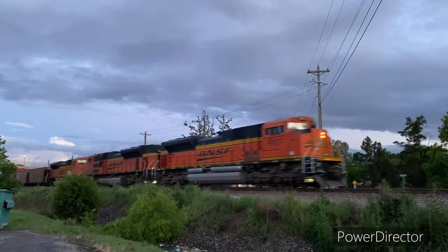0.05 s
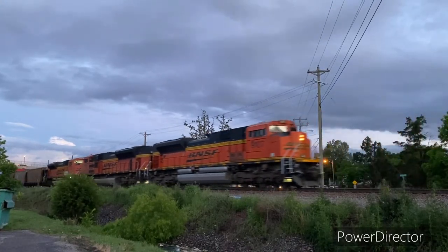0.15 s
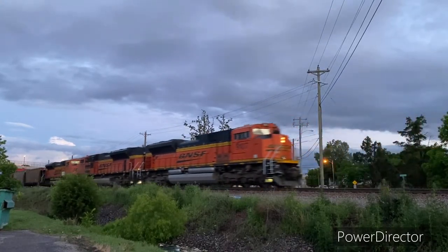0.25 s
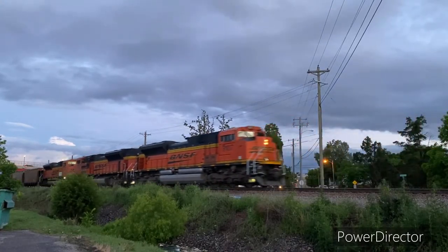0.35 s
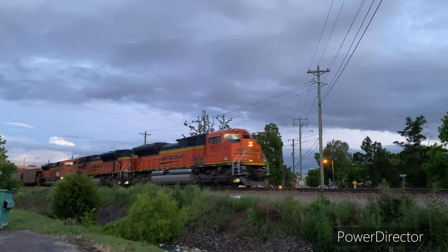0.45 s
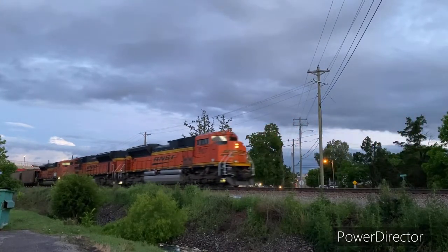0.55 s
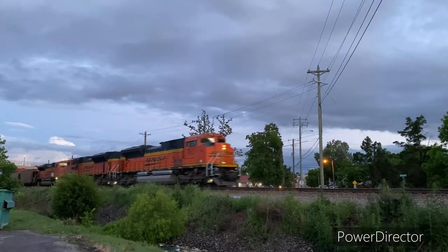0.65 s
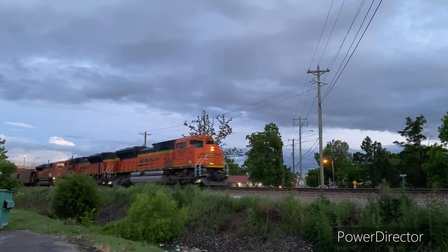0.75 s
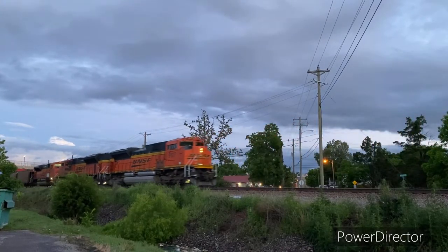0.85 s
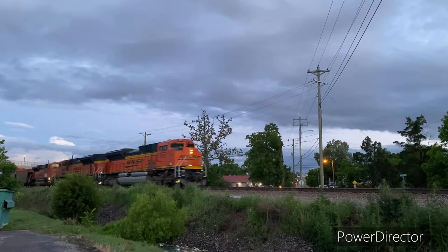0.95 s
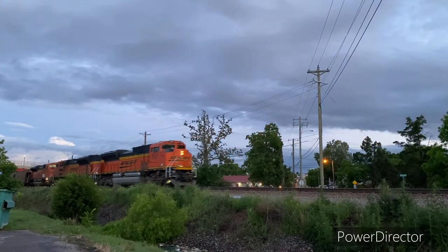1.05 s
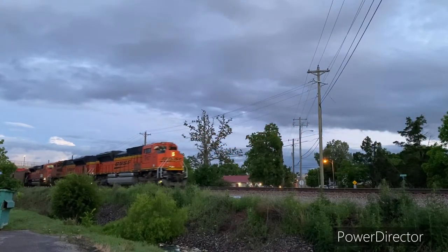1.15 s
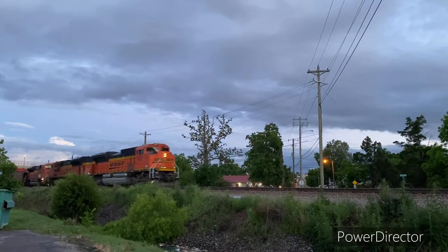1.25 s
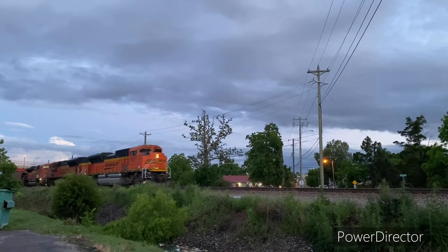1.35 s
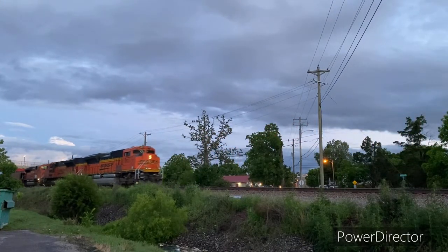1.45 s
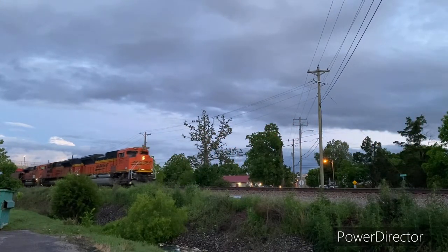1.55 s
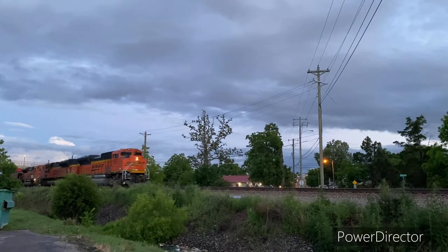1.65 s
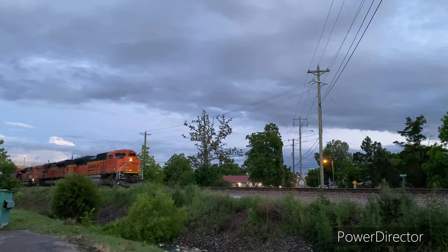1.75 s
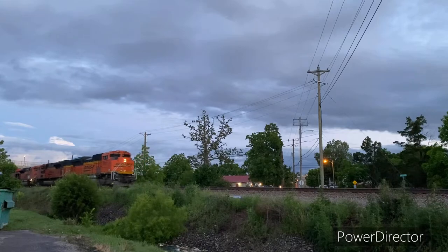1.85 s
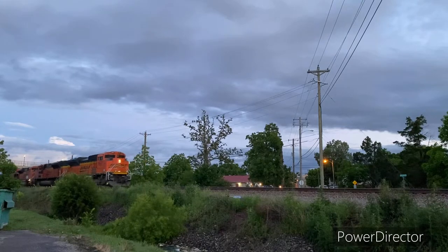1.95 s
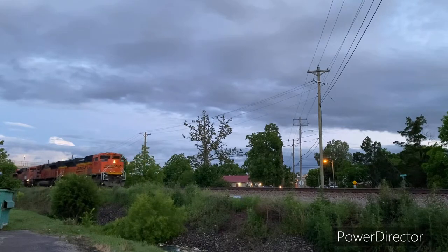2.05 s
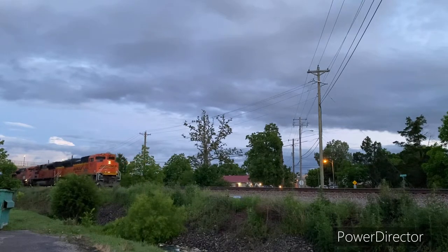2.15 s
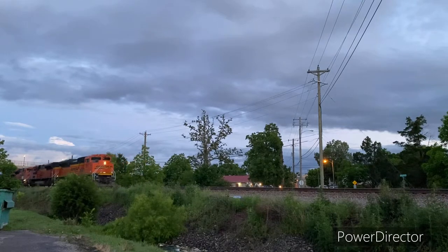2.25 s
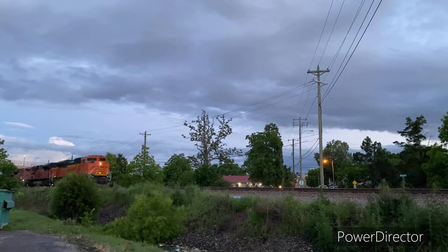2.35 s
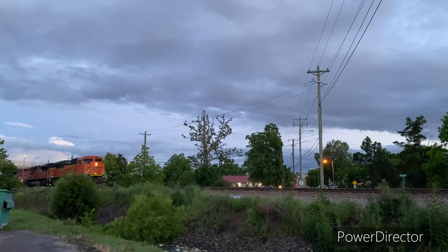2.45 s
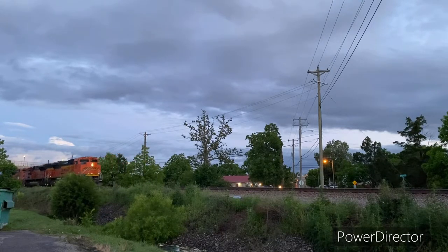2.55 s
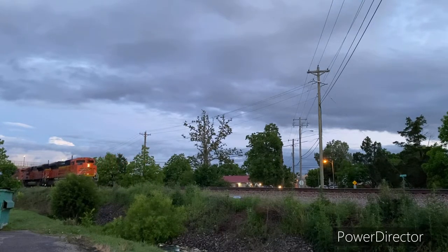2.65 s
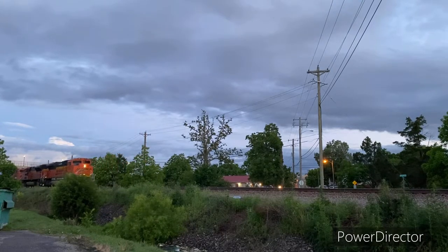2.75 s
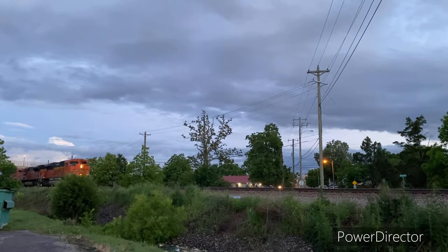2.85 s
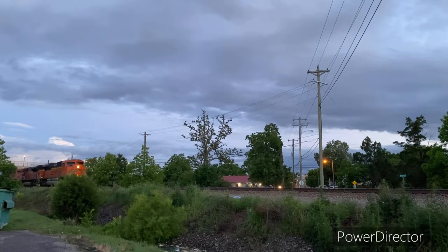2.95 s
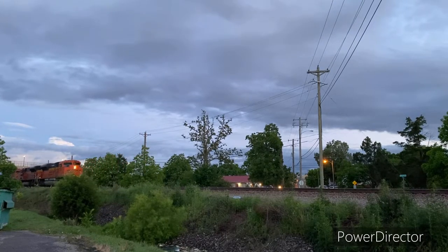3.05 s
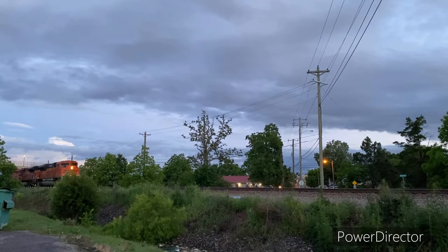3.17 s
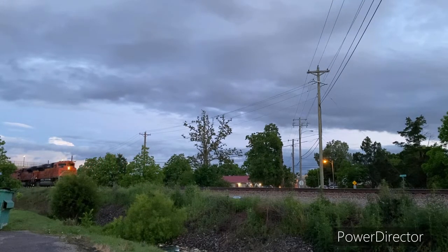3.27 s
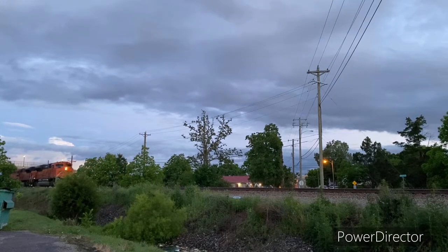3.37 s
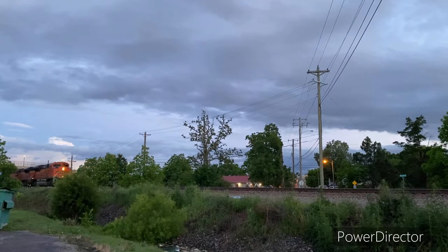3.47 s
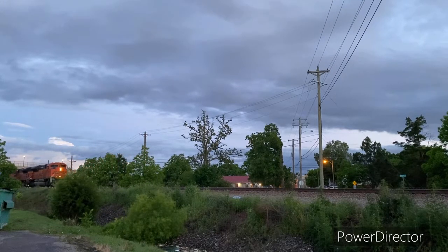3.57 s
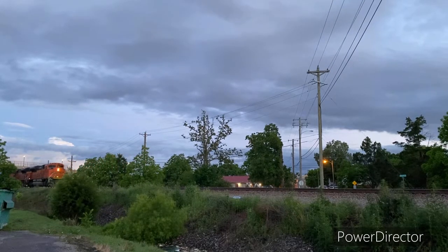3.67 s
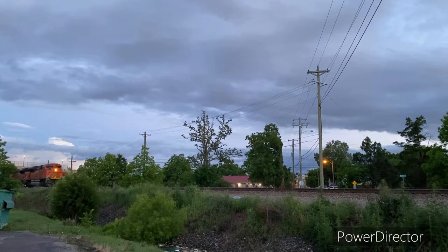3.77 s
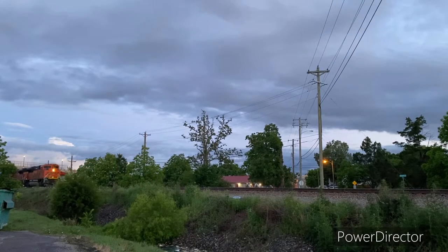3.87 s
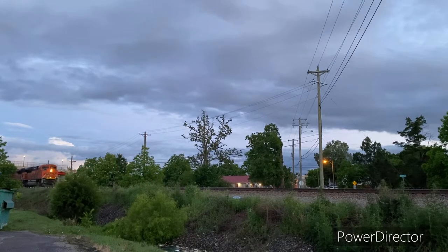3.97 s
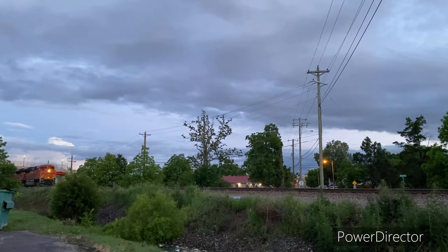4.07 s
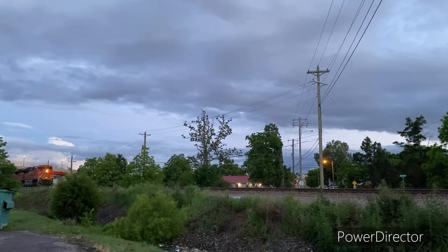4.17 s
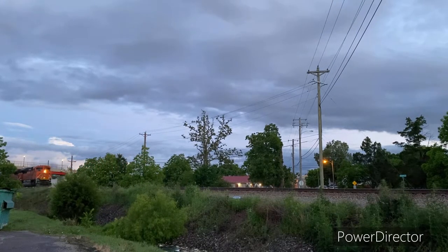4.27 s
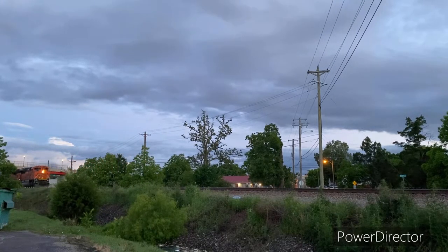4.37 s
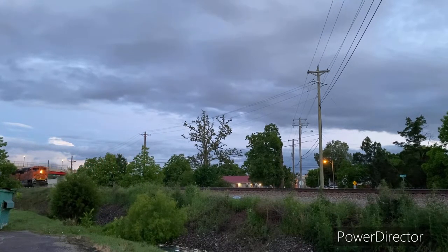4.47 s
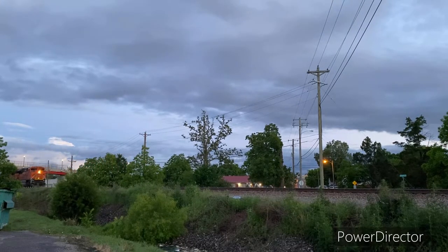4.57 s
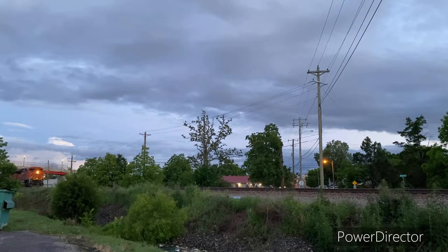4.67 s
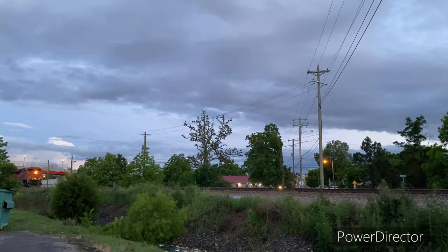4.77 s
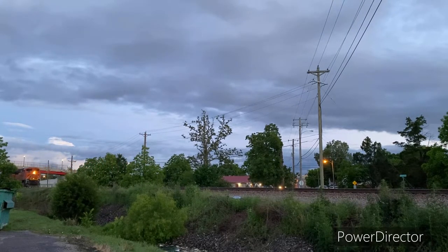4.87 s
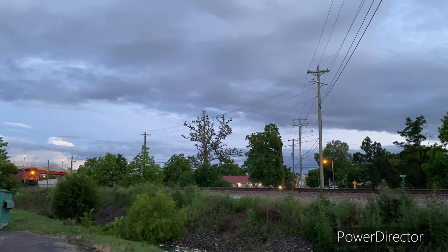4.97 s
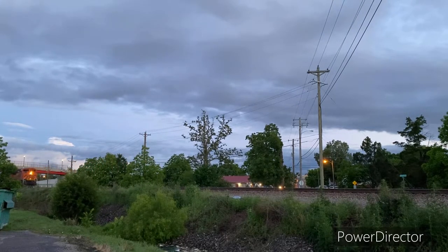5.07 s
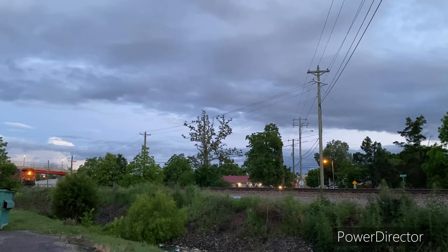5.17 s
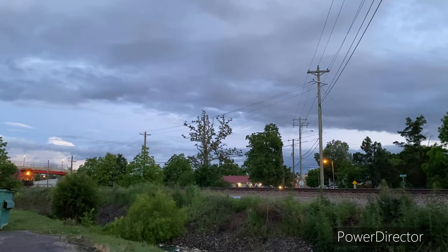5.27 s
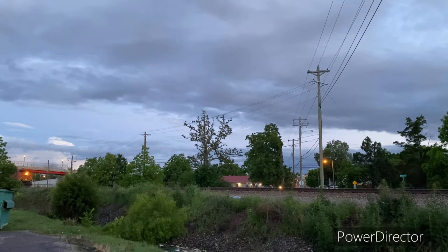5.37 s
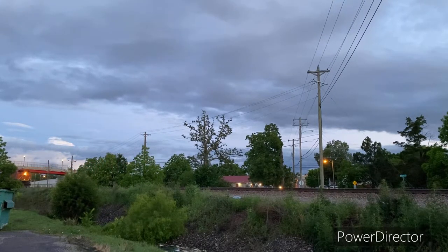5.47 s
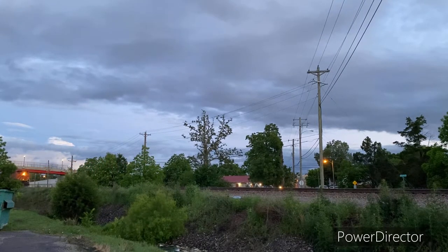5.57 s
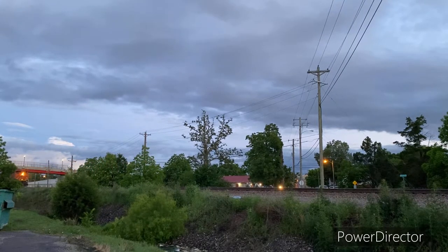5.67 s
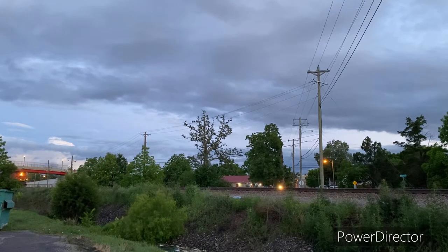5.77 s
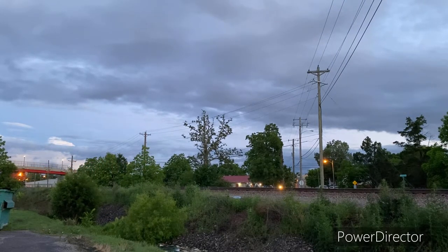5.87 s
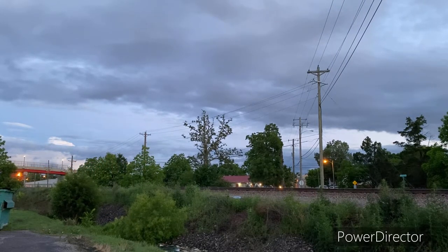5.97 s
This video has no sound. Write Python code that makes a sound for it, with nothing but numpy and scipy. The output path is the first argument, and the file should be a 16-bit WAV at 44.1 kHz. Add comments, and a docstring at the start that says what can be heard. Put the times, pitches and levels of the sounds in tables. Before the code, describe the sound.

Outdoors beside a railway, a fixed phone-like stereo microphone hears diesel locomotives drawing away over six seconds. At 0 s the sound is close and full: a deep, uneven exhaust drone with a quick throb, heavy wheel rumble, rolling roar, many blurred mechanical whines, and a bright steel sizzle with brief squeals and a sharp air spit. Within the first second the brightest parts drop away. From 1 to 2 s, wavering fan hum and gear whine ride over the fading roar, with faint squeals, soft air hisses and cricket trills. Wind buffets in lumps, building to hard low thumps at about 2.8-3.3 s, then easing as the rumble briefly dips. From 4 s the train is distant: a dull, low drone and rumble, thin rail hiss, tiny air spits at about 5.1 and 5.5 s, crickets weakening. It continues to the end, slightly weighted right.

```python
"""Train drawing away at dusk

Diesel locomotives push a long train away from a phone that stands beside the track.
The exhaust drones on multiples of its firing cycle and fans and gears whine as wavering tones.
Wheels roar and squeal and air valves spit, as shaped noise and narrow tones; the train fades with distance.
Crickets trill in the grass as pulsing tones, and a gust buffets the two microphone ports."""
import sys
import numpy as np
from scipy import signal
from scipy.fft import rfft, irfft, next_fast_len
from scipy.io import wavfile
from scipy.ndimage import uniform_filter1d, map_coordinates

SR = 44100
rng = np.random.default_rng(int(sys.argv[2]) if len(sys.argv) > 2 else 0)


def file_out(sig):
    """Save sig as 16-bit WAV at sys.argv[1]."""
    # one column per channel
    cols = np.atleast_2d(sig).T
    # limit, then scale
    lim = np.clip(cols, -1, 1)
    pcm = np.round(lim * 32767).astype(np.int16)
    wavfile.write(sys.argv[1], SR, pcm)


N = 265712
T = np.arange(N) / SR  # seconds
FIRING_HZ = 5.875  # one whole engine cycle, in which every cylinder fires once

# Doppler shift as the path turns away. Each row: time in seconds, pitch factor.
GLIDE = [(0, 1.008), (.5, 1.004), (1.5, 1.001), (3, .997), (6.03, .996)]
# How alike the two ports hear the noises. Each row: frequency in Hz, left-right likeness (0 to 1).
ALIKE = [(50, 0.91), (110, 0.94), (250, 0.96), (600, 0.58), (1500, 0.67), (3000, 0.28), (4300, 0.93),
         (6000, 0.059)]
# Wheel modes that squeal. Each: frequency in Hz, width in Hz.
DEEP, LOW, MIDDLE, HIGH = (3650, 60), (4995, 55), (6520, 110), (11084, 50)


def amp(db):
    """Decibels to gain."""
    return 10 ** (np.asarray(db) / 20)


def unit(x):
    """Scaled to rms 1."""
    return x / np.sqrt(np.mean(np.abs(x) ** 2) + 1e-20)


def along(points, hz):
    """Read a table of (Hz, value) points on a log frequency axis."""
    f, v = np.transpose(points)
    return np.interp(np.log(hz + 1), np.log(f + 1), v)


def curves(rows):
    """One value per sample for each column after the time."""
    s, *cols = np.transpose(rows)
    return [np.interp(T, s, c) for c in cols]


def wobble(rate):
    """A smooth random curve, rate knots a second."""
    knots = rng.standard_normal(int(N * rate / SR) + 4)
    return map_coordinates(knots, [T * rate])


def filtered(x, response):
    """x times a response of frequency."""
    m = next_fast_len(N + 8192)
    return irfft(rfft(x, m) * response(np.fft.rfftfreq(m, 1 / SR)), m)[..., :N]


def rush(spectrum, alike, patchy_db):
    """Stereo noise of rms 1 with patches of random gain, silent outside its spectrum table."""
    z = signal.stft(rng.standard_normal((2, N)), nperseg=512)[2]
    field = rng.standard_normal(z.shape[1:])
    field = uniform_filter1d(uniform_filter1d(field, 6, 0), 12, 1)
    pair = signal.istft(z * amp(patchy_db * unit(field)), nperseg=512)[1][:, :N]

    def mid_side_response(hz):
        inside = (hz > spectrum[0][0]) * (hz < spectrum[-1][0])
        turn = np.arccos(np.clip(along(alike, hz), -1, 1)) / 2
        return amp(along(spectrum, hz)) * inside * [np.cos(turn), np.sin(turn)]

    mid, side = filtered(pair, mid_side_response)
    return unit(np.array([mid + side, mid - side]))


def tone(hz, width_hz, rough, apart):
    """A stereo tone of rms 1; the air and the ground scatter a share of it into a band of noise."""
    share = np.clip(rough, 0, 1)
    blur = lambda: unit(wobble(width_hz) + 1j * wobble(width_hz))
    common = np.sqrt(1 - share) + np.sqrt(share) * blur()
    own = apart * np.array([blur(), blur()])
    carrier = np.exp(2j * np.pi * (np.cumsum(hz * np.ones(N)) / SR + rng.random()))
    return unit(np.real((common + own) * carrier))


def engine():
    """Firing pulses leave the stack as a drone; the higher multiples arrive more scattered."""
    # Exhaust level, wavering as it recedes. Each row: time in seconds, level in dB.
    drone = [(0.0, -27), (0.08, -24), (0.22, -22), (0.64, -18.5), (0.7, -26), (0.79, -20), (0.84, -28),
             (1.46, -20), (1.53, -27), (1.58, -25), (1.88, -21), (2.92, -26), (3.14, -24.5), (3.49, -34.5),
             (4.01, -23.5), (4.09, -25.5), (4.18, -22.5), (5.0, -27.5), (5.07, -23), (5.5, -28),
             (5.72, -22.5), (5.79, -32.5), (5.97, -24.5), (6.03, -27)]
    # Uneven cylinders put lines on many multiples of the cycle.
    # Each row: multiple of the cycle, level in dB relative to the exhaust level.
    orders_db = [(7, -52), (8, 1), (9, -9.5), (10, -14.5), (11, -10.5), (12, -29), (13, -14), (14, -18.5),
                 (15, -11.5), (16, -21.5), (17, -18), (19, -22), (23, -19.5), (24, -15.5), (27, -23.5),
                 (30, -30), (32, -21.5)]
    scatter = .03  # share of noise gained with each multiple above the seventh
    (db,), (glide,) = curves(drone), curves(GLIDE)
    multiples, levels_db = np.transpose(orders_db)
    lines = 0
    for k, level_db in zip(multiples.round(), levels_db):
        line = tone(k * FIRING_HZ * glide, 3.134, rough=scatter * (k - 7), apart=0.092)
        lines = lines + amp(level_db) * line
    return amp(db) * lines


def whines():
    """Fan blades and gear teeth sing with their octave; the nearest unit adds blurred whines,
    some narrow and some broad, that fade."""
    # Wavering fan hum and its octave, gear whine and its octave. Each row: time in seconds, level in dB.
    fan = [(0, -38), (.05, -27), (.12, -34.5), (.25, -29), (.4, -28), (.46, -47), (1, -37), (1.13, -32),
           (1.2, -46), (1.35, -36), (1.52, -36), (1.6, -29.5), (1.74, -46), (1.9, -34.5), (2.04, -33),
           (2.11, -40), (2.25, -34.5), (2.46, -32.5), (2.56, -53), (2.65, -31), (2.86, -34), (2.9, -54),
           (3.17, -35), (3.25, -53), (3.45, -48), (3.57, -36), (3.63, -52), (3.78, -36.5), (3.97, -40),
           (4.1, -58), (4.25, -41), (5, -65), (5.1, -45), (6.03, -52)]
    fan_octave = [(0, -35), (.3, -36.5), (.38, -49), (.5, -34), (.68, -36.5), (.85, -38.5), (1, -47),
                  (1.25, -42), (1.45, -42.5), (1.65, -49), (1.75, -50), (1.9, -42), (2, -50), (2.12, -39),
                  (2.35, -39.5), (2.45, -55), (2.55, -46), (2.7, -49.5), (3.12, -45.5), (3.32, -55),
                  (3.45, -41.5), (3.7, -49), (3.85, -61), (5, -51), (6.03, -49)]
    gear = [(0, -57), (.15, -43.5), (.32, -42.5), (.5, -50), (1.3, -50.5), (1.5, -42.5), (1.88, -43),
            (1.95, -52), (2.3, -48), (2.8, -50), (3.25, -45.5), (3.34, -49), (3.42, -46), (3.52, -63),
            (3.9, -51.5), (4.4, -50.5), (4.53, -48), (4.63, -54), (4.72, -50), (5.03, -60), (6.03, -58)]
    gear_octave = [(0, -56), (.13, -49), (.22, -54), (.45, -48), (.7, -52), (1, -49), (1.12, -57),
                   (1.38, -53), (1.6, -56), (1.85, -52), (2.1, -57), (3, -61), (3.6, -59), (5.5, -61),
                   (5.8, -58), (6.03, -58)]
    # Shared level of two broad hums in the roar. Each row: time in seconds, level in dB.
    growl = [(0.0, -37), (0.94, -34), (1.04, -44), (1.11, -30), (1.33, -43), (1.38, -33), (2.63, -44.5),
             (2.74, -39), (3.41, -54), (3.42, -51), (4.53, -47), (4.8, -41.5), (5.96, -42), (6.03, -38)]
    # The two hums. Each row: frequency in Hz, width in Hz, level in dB relative to the shared level.
    growl_hums = [(578.6, 45, -7), (657, 55, -6)]
    # Whines of the nearest locomotive, lost as it draws away: one frequency in Hz for each.
    whine_hz = 307, 436, 1238, 1846, 2939, 3655, 5825, 6225, 6700, 8000, 9365, 10670, 12000
    # The same whines in order. Each row: width in Hz, level at the start in dB, fade in dB a second.
    whine_fades = [(9.9, -47, 4.5), (30.12, -36, 3), (20.13, -44.5, 7), (23.2, -50, 6.5), (35.3, -48, 13),
                   (110.2, -46.5, 18), (90, -43, 60), (91, -35.5, 80), (110, -33.5, 70), (208, -47.5, 22),
                   (101, -43, 61), (203, -43.5, 50), (250, -43, 55)]
    glide, = curves(GLIDE)
    out = 0
    for first_db, octave_db, hz, width_hz, grain in ((fan, fan_octave, 408, 20, .3),
                                                     (gear, gear_octave, 1299, 25, .55)):
        out = out + amp(curves(first_db)[0]) * tone(hz * glide, width_hz, rough=.15, apart=.2)
        octave = tone(2 * hz * glide, 1.8 * width_hz, rough=grain, apart=.3)
        out = out + amp(curves(octave_db)[0]) * octave
    growl_db, = curves(growl)
    for hz, width_hz, db in growl_hums:
        out = out + amp(db + growl_db) * tone(hz, width_hz, rough=.95, apart=.4)
    for hz, (width_hz, db, fade_db) in zip(whine_hz, whine_fades):
        out = out + amp(db - fade_db * T) * tone(hz, width_hz, rough=.95, apart=.4)
    return out


def wheels():
    """Wheels on rails: a throbbing rumble, rolling roar and rail hiss, each a band of shaped noise."""
    # Spectra of rumble, roar, rail hiss, a narrower hiss band and a late rough hiss.
    # Each row: frequency in Hz, relative density in dB per Hz.
    rumble = [(20, -23), (35, 3), (55, -2.5), (85, -1.5), (112, -9), (145, -4), (209, -9), (335, -9.5),
              (420, -16), (550, -63)]
    rolling = [(210, -18.5), (350, -6.5), (416, -5), (487, -9), (751, -12), (821, -9.5), (993, -18),
               (1310, -20.5), (1600, -47), (2080, -65), (3520, -120)]
    rail = [(710, -32), (1200, -5), (1260, -0.5), (1580, -3.5), (3500, -10), (4280, -13), (4770, -14.5),
            (5320, -8), (6000, -25), (7800, -31), (13200, -120)]
    hiss_band = [(3300, -31), (3800, -5), (4300, -1.5), (4700, -4), (5100, -20)]
    late_band = [(1900, -25), (2400, 5), (3000, 2), (3500, -12), (4000, -2), (4500, -20)]
    # Course of the narrower hiss band. Each row: time in seconds, level in dB before a 1.5 dB cut.
    hiss = [(0.0, -49), (0.05, -49), (1.31, -51.5), (1.8, -47.5), (2.33, -54), (2.36, -45), (2.41, -54),
            (2.48, -52), (2.52, -62), (2.77, -53), (3.27, -65), (3.89, -52.5), (5.54, -62.5), (6.03, -53)]
    # The roar and rail hiss swell. Each row: middle in seconds, half length in seconds, rise in dB.
    swells = [(1.806, 0.22, 1.5), (5.9, 0.26, 1)]
    # the throb comes twice a cycle, at a slightly unsteady rate
    throb_hz = 2 * FIRING_HZ * (1 + 0.035 * wobble(3.06))
    throb = np.sin(2 * np.pi * np.cumsum(throb_hz) / SR)
    chug = amp(1.5 * throb + 0.32 * wobble(11) + 2.67 * wobble(45))  # throb and uneven lumps, dB
    swell_db = sum(db * np.exp(-((T - s) / half) ** 2) for s, half, db in swells)
    out = fade(-23.5, 4.6, -39.5) * dip() * unit(chug * rush(rumble, ALIKE, patchy_db=0.5))
    out += fade(-27.5, 7.54, -38.5) * amp(swell_db) * rush(rolling, ALIKE, patchy_db=0.75)
    out += amp(curves(hiss)[0] - 1.5) * rush(hiss_band, ALIKE, patchy_db=3.5)
    late_start_s, late_rise_s, late_db = 5.36, 0.27, -52
    late_gain = amp(late_db) * np.clip((T - late_start_s) / late_rise_s, 0, 1)
    out += late_gain * rush(late_band, ALIKE, patchy_db=2.0)
    return out + fade(-36.5, 7.5, -44.5) * amp(swell_db) * rush(rail, ALIKE, patchy_db=1.04)


def fade(near_db, loss_db, far_db):
    """Gain of a layer that loses loss_db per doubling of distance, over the steady far line."""
    double_s = 1.48  # the nearest locomotive is twice as far away after this time
    return np.hypot(amp(near_db - loss_db * np.log2(1 + T / double_s)), amp(far_db))


def dip():
    """Gain of the rumble: it dips briefly, then returns."""
    start_s, fall_s, back_s, depth_db = 3.16, 0.19, 0.71, 7
    return amp(-depth_db * np.interp(T, np.cumsum([start_s, fall_s, back_s]), [0, 1, 0]))


def flanges():
    """Wheel flanges rub: a bright sizzle of steel as noise, with short squeals on the wheel modes."""
    # Course of the sizzle. Each row: time in seconds, level in dB.
    rub = [(0, -37), (.2, -46), (.42, -49), (1.25, -54.5), (1.45, -52), (1.95, -52), (2.48, -60.5),
           (2.88, -53), (3.32, -61.5), (4.06, -57.5), (5.57, -67.5), (6.03, -65.5)]
    # Spectrum of the sizzle. Each row: frequency in Hz, relative density in dB per Hz.
    sizzle = [(4500, -37), (5600, 0.5), (6600, 0), (7600, -8.5), (8600, -5.5), (10000, -8.5), (11500, -17),
              (13500, -22.5), (15800, -25)]
    # Squeals once in a while. Each row: start in seconds, length in seconds, wheel mode, peak level in dB.
    squeals = [(-.09, 0.21, DEEP, -42.5), (-.25, 0.5, MIDDLE, -45), (-.06, 0.097, LOW, -37.5),
               (-.2, 0.4, LOW, -52), (0.24, 0.08, MIDDLE, -45.5), (1.304, 0.25, MIDDLE, -52),
               (1.312, 0.18, LOW, -53.5), (1.66, 0.32, LOW, -53), (2.64, 0.2, HIGH, -65),
               (2.8, 0.24, MIDDLE, -58), (2.8, 0.14, LOW, -58), (4.05, 0.14, HIGH, -70),
               (4.28, 0.16, LOW, -58), (5.097, 0.13, HIGH, -81)]
    rub_db, = curves(rub)
    out = amp(rub_db) * rush(sizzle, ALIKE, patchy_db=2.5)
    for s, length, (hz, width_hz), db in squeals:
        swell = np.sin(np.pi * np.clip((T - s) / length, 0, 1)) ** 0.67
        out += amp(db) * swell * tone(hz, width_hz, rough=.3, apart=.4)
    return out


def valves():
    """Air valves spit: each jet of noise opens fast, holds and dies away under a lingering echo."""
    # Each row: start in seconds, rise in seconds, hold in seconds, level in dB without the echo.
    spits = [(0, .002, 0.082, -43.5), (1.204, .004, 0.11, -56.5), (1.34, .03, .06, -62),
             (1.51, 0.055, 0.18, -57), (1.723, .02, .04, -62), (1.87, 0.018, 0.046, -63),
             (2.575, .004, .1, -57.5), (3.846, 0.0032, .008, -68), (3.908, .06, 0.19, -61),
             (5.099, .004, .04, -63.5), (5.476, .004, .04, -67)]
    # Spectrum of the jet. Each row: frequency in Hz, relative density in dB per Hz.
    jet = [(8500, -43), (10000, -12), (11000, 0.5), (12000, -17), (13500, 0), (15000, -5), (15800, 6.5)]
    jet_t60_s, echo_t60_s, echo_db = 0.28, 1.8, -10.5  # times to fall 60 dB; echo relative to the jet
    flow = np.zeros(N)
    for s, rise, hold, db in spits:
        opening = np.clip((T - s) / rise, 0, 1)
        after = np.clip(T - s - rise - hold, 0, None)
        decay = amp(-60 * after / jet_t60_s) + amp(echo_db - 60 * after / echo_t60_s)
        flow += amp(db) * opening * decay
    return flow * rush(jet, ALIKE, patchy_db=1.5)


def wind():
    """Lumpy buffeting with a few hard thumps, the buffeting only partly shared by the two ports."""
    # Course of the gust. Each row: time in seconds, level in dB.
    gust = [(0, -18.5), (.15, -34.5), (.6, -29), (.9, -31), (1.2, -27), (1.4, -31.5), (1.6, -23.5),
            (1.9, -30), (2.15, -33.5), (2.4, -26), (2.6, -28), (2.8, -25.5), (2.95, -23.5), (3.1, -22),
            (3.25, -28.5), (3.36, -36.5), (4.1, -41), (4.5, -41), (5.2, -49), (6.03, -37)]
    # Spectrum of the buffeting. Each row: frequency in Hz, relative density in dB per Hz.
    buffet = [(15, -26), (30, -28), (45, -29), (65, 0.5), (115, 1), (170, -5), (260, -12.5), (350, -19),
              (500, -44)]
    # The hardest lumps. Each row: middle in seconds, frequency in Hz, length in cycles, peak in dB.
    thumps = [(2.838, 136, 2.5, -15), (2.93, 125, 2, -12.5), (2.973, 65.4, 1.1, -12),
              (3.004, 150, 3.8, -17), (3.073, 100, 1.3, -12.5), (3.0918, 204, 0.71, -8),
              (3.099, 168, 0.8, -5.5), (3.121, 131, 1.1, -14), (3.137, 110, 1.3, -15),
              (3.164, 97, 0.54, -8.5), (3.207, 85.5, 1, -9), (3.283, 96, 1.8, -17.5)]
    db, = curves(gust)
    lumps = amp(2 * wobble(35))  # dB of depth, knots a second
    likeness = [(30, .3), (70, 0.42), (200, 0.93)]  # (Hz, left-right likeness)
    out = amp(db) * unit(lumps * rush(buffet, likeness, patchy_db=2.0))
    for s, hz, cycles, peak_db in thumps:
        turns = (T - s) * hz
        skew = rng.normal(0, 0.31, (2, 1))  # each port feels the lump a little differently
        out -= amp(peak_db) * np.exp(-(2 * turns / cycles) ** 2) * np.cos(2 * np.pi * turns + skew)
    return out


def crickets():
    """Three singers close in pitch, each a blurred tone pulsing at its own rate of wing strokes."""
    # Course of the chorus. Each row: time in seconds, level in dB.
    chorus_level = [(0.0, -45), (0.05, -51), (0.67, -54), (0.69, -42), (0.74, -51.5), (1.12, -42.5),
                    (1.16, -53), (1.51, -50), (1.58, -44.5), (1.81, -42.5), (1.89, -50), (1.96, -39.5),
                    (2.11, -51), (2.18, -47), (2.62, -55), (2.63, -49.5), (3.15, -50.5), (3.24, -57),
                    (3.74, -45), (3.79, -50), (4.33, -54), (4.45, -48.5), (4.56, -55), (4.73, -48.5),
                    (4.76, -58), (5.03, -48), (5.1, -52), (5.6, -61), (5.72, -57), (6.03, -59)]
    db, = curves(chorus_level)
    chorus = 0
    # pitch in Hz, strokes a second, level in dB within the chorus
    for hz, strokes_hz, singer_db in ((5275, 40, -3), (5350, 85, -1), (5315, 43, 0)):
        rate_hz = strokes_hz * (1 + 0.05 * wobble(3))
        strokes = 1 + 0.29 * np.sin(2 * np.pi * np.cumsum(rate_hz) / SR)
        song = tone(hz + 8 * wobble(11), 85, rough=0.49, apart=0.55)
        chorus = chorus + amp(singer_db + 0.51 * wobble(7.2)) * strokes * song
    return amp(db) * unit(chorus)


def scene():
    """The body of the train sound reaches the left port first, more so as it draws away."""
    # Each row: time in seconds, left ahead in ms, left louder in dB.
    bearing = [(0, 0.044, -4.5), (.85, 0.055, -4), (1.2, 0.17, -3), (2.5, 0.21, -4), (6.03, 0.26, -3)]
    train = engine() + whines() + wheels()
    ahead_ms, louder_db = curves(bearing)
    placed = []
    for channel, side in zip(train, (1, -1)):  # each channel takes half of the difference
        moved = np.arange(N) + side * ahead_ms * SR / 2000
        placed.append(amp(side * louder_db / 2) * map_coordinates(channel, [moved], mode="nearest"))
    return np.array(placed) + flanges() + valves() + crickets() + wind()


def record(dry):
    """The phone cuts deep bass and sends one treble signal to both channels, spread by a phase ramp."""
    # One row: shared treble above Hz, in phase at Hz, left behind in ms.
    ports = 7600, 6530, .272
    # Balance below the shared treble. Each row: frequency in Hz, left minus right in dB.
    sides = [(60, 2.5), (180, 2), (550, 6), (1650, 6), (4970, 4.5), (15000, -8)]
    low_hz, top_hz = 35.2, 15606  # bass cut, upper limit
    split_hz, zero_hz, behind_ms = ports
    upper = lambda hz: np.clip((hz - split_hz) / 600 + .5, 0, 1) * np.pi / 2  # crossover angle
    ramp = lambda hz: np.exp(1j * np.pi * np.outer([-1, 1], hz - zero_hz) * behind_ms / 1000)
    balance = lambda hz: amp(np.outer([.5, -.5], along(sides, hz)))
    bass_cut = lambda hz: 1 / (1 + (low_hz / (hz + 1)) ** 8)
    body = filtered(dry, lambda hz: np.cos(upper(hz)) * balance(hz) * bass_cut(hz))
    treble = filtered(dry[0], lambda hz: np.sin(upper(hz)) * ramp(hz))
    return filtered(body + treble, lambda hz: hz < top_hz)


dry = scene()
out = record(dry)
file_out(out)
```